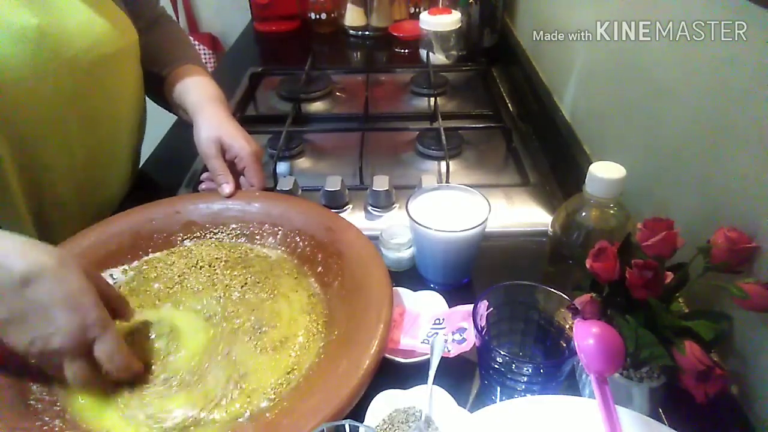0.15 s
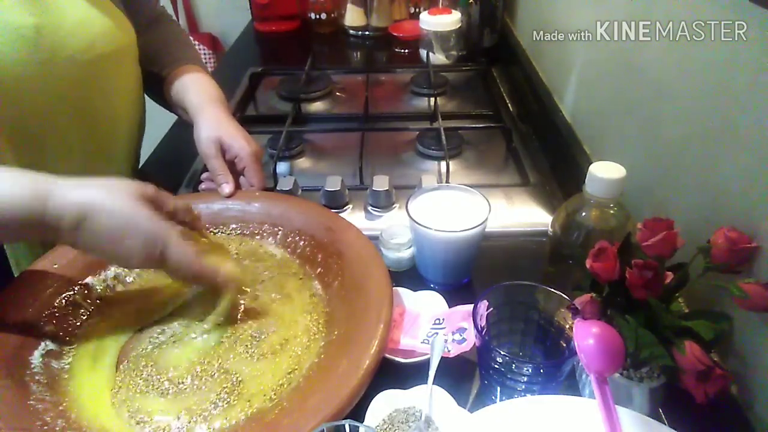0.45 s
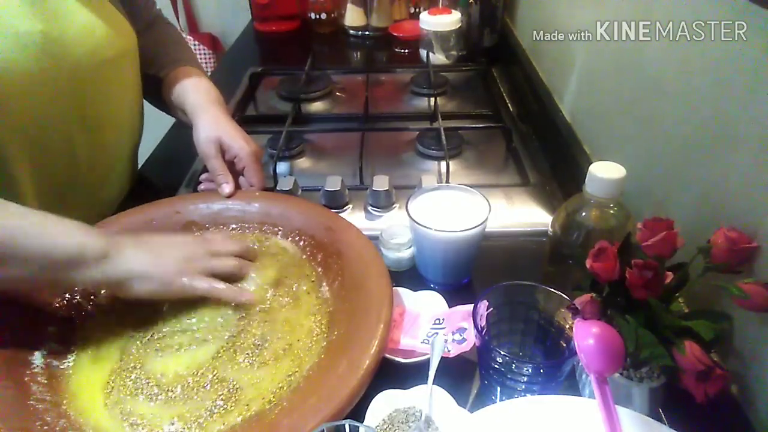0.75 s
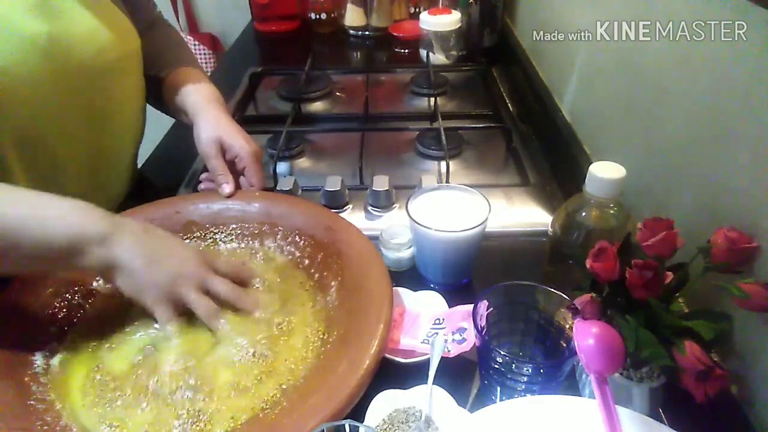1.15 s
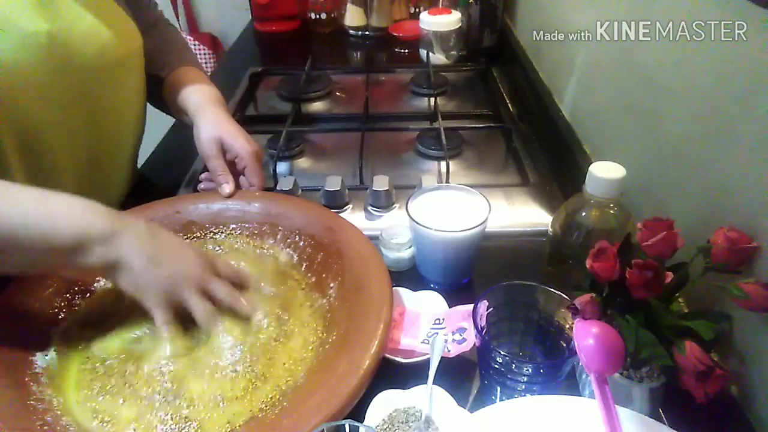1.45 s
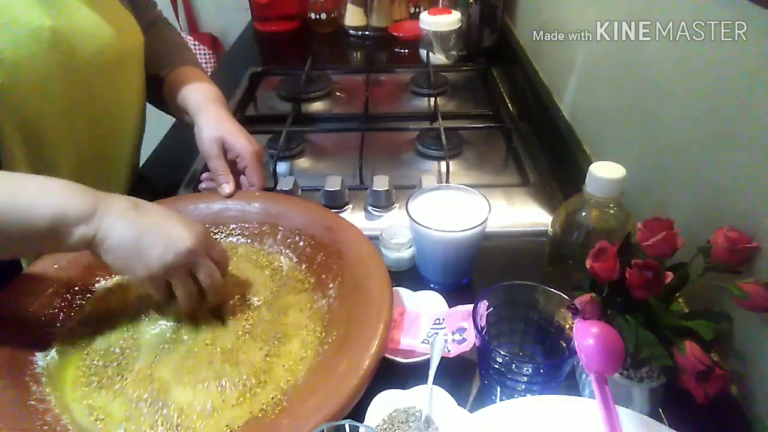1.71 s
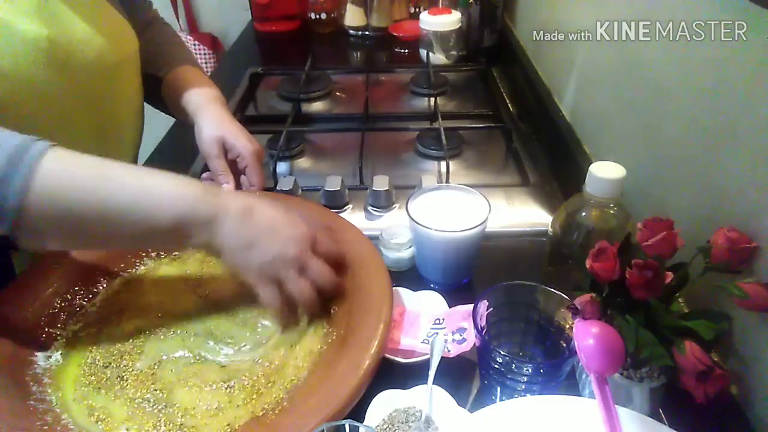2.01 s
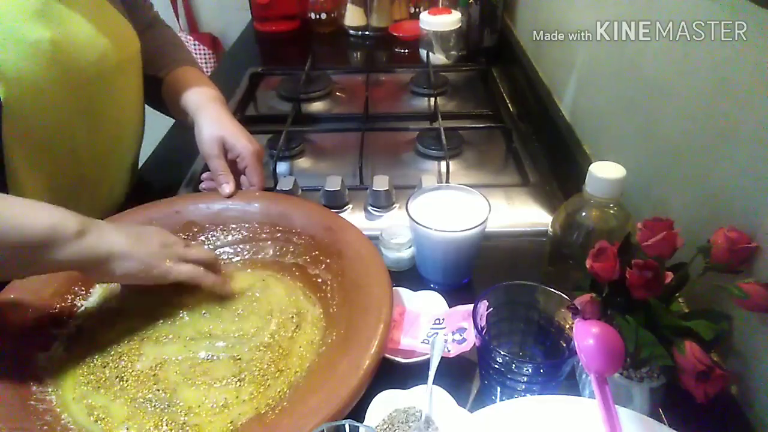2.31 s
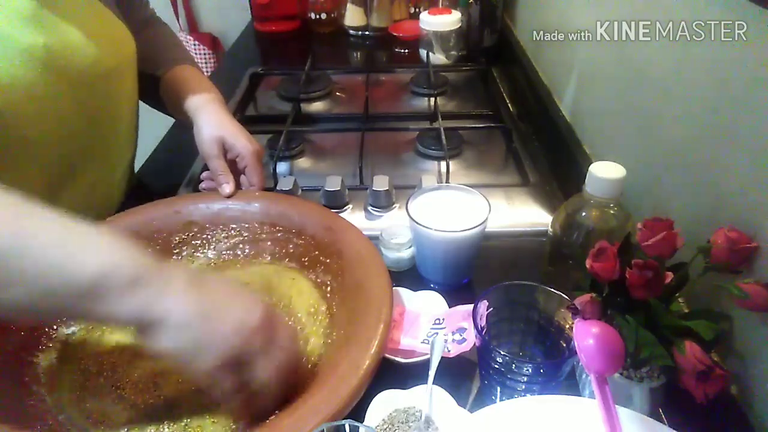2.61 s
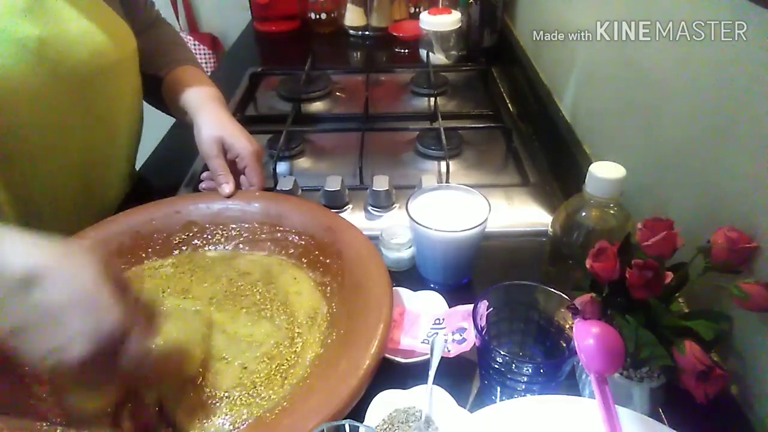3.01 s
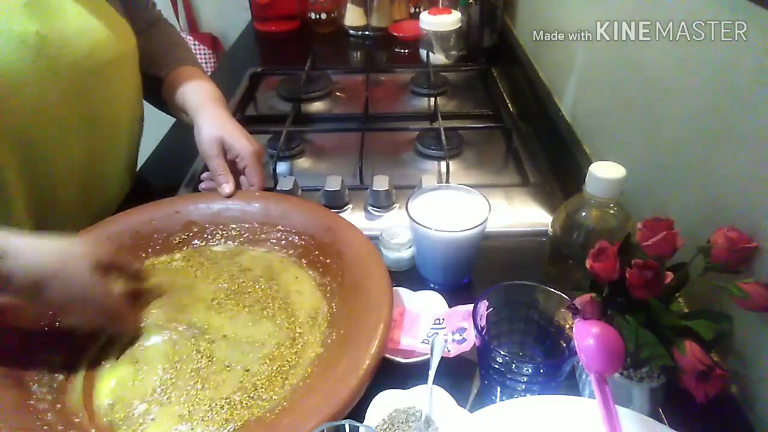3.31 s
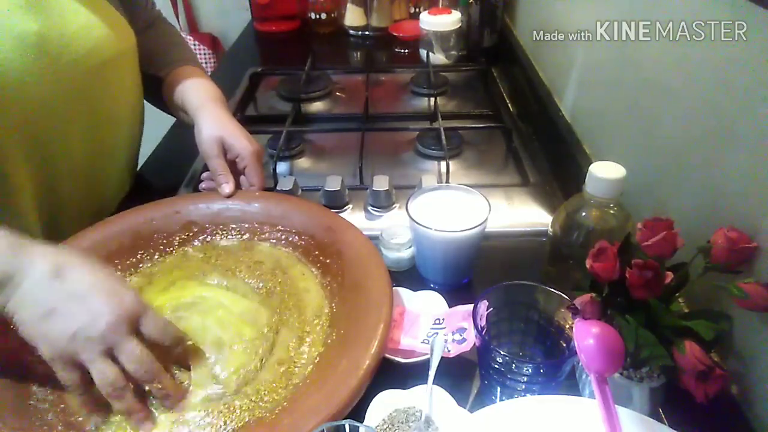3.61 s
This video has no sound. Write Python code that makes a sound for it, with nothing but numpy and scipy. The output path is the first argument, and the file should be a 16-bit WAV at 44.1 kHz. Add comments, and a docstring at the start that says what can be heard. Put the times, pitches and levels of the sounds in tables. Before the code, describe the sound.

A hand stirs wet, seedy batter in a clay bowl, close up in a small reverberant kitchen. A stroke dies away, then a loud wet slap and snaps land at 0.19 s. Gritty squishes last until 0.5, softer swishes run 0.75-1.0 and 1.1-1.8 with hollow plops. Low bowl thumps open stronger, hissier scrapes at 2.07 and 2.7; after a brief pause, another comes at 3.2-3.5, then near silence over faint hum.

```python
"""A hand stirs oily batter full of seeds round a wide glazed clay bowl in a small kitchen.
First a stroke dies away, then the hand lands: wet films snap, the clay rings and the liquid slaps.
It scoops, lifts, pushes and swirls, as clicks (seeds, rubbing) and bubbles (sloshing) swell and fade.
Knocks and low thumps of the bowl open a sweep and a drag; after a short pause the hand returns.
Hollow plops and gurgles dot the way; noise-like room tails and a faint mains hum lie around it all."""
import sys
import numpy as np
from scipy import signal
from scipy.io import wavfile
from scipy.ndimage import uniform_filter1d

SR = 44100
rng = np.random.default_rng(int(sys.argv[2]) if len(sys.argv) > 2 else 0)


def dump(signal):
    """Clip the signal to [-1, 1] and save it as 16-bit WAV at the path in sys.argv[1]."""
    limited = np.clip(np.atleast_2d(signal).T, -1, 1)
    pcm = np.round(limited * 32767).astype(np.int16)
    wavfile.write(sys.argv[1], SR, pcm)


N = 165375
T = np.arange(N) / SR
HIT_ROOM_DB = -5  # room tail against the direct sound


def amp(db):
    """Decibels to gain."""
    return 10 ** (np.asarray(db) / 20)


def unit(x):
    """Scales to an rms of one."""
    return x / np.sqrt(np.mean(x ** 2) + 1e-20)


def read(points, hz):
    """Reads a table on a log-frequency axis."""
    f, value = np.transpose(points)
    return np.interp(np.log(hz + 1), np.log(f + 1), value)


def add(mix, s, sound):
    """Mixes a sound in at a time in seconds."""
    part = mix[max(round(s * SR), 0):][:len(sound)]
    part += sound[:len(part)]


def colour(x, points, size=2048):
    """Causal filter of unit energy with the given spectrum."""
    hz = abs(np.fft.fftfreq(size, 1 / SR))
    log_gain = np.log(amp(read(points, hz)))
    # minimum phase puts the energy at the start of the kernel
    spectrum = np.exp(np.conj(signal.hilbert(log_gain)))
    kernel = np.fft.ifft(spectrum).real
    return signal.fftconvolve(x, kernel / np.linalg.norm(kernel))[:len(x)]


def clicks(per_s, spread_db, size=N):
    """Random clicks of uneven size and either polarity, at unit rms."""
    strength = amp(spread_db * np.minimum(rng.exponential(1, size), 4))
    polarity = rng.choice([-1., 1.], size)
    struck = rng.random(size) < per_s / SR
    return unit(strength * polarity * struck)


def bubbles(per_s, spread_db, cycles, glide, low_hz=300, high_hz=2600, count=28):
    """Tiny bubbles of many sizes, each a short rising note that falls to 1/e in the given cycles."""
    t = np.arange(2048) / SR
    out = np.zeros(N)
    for hz in np.geomspace(low_hz, high_hz, count):
        age = hz * t / cycles
        note = np.sin(2 * np.pi * hz * t * (1 + glide * age)) * np.exp(-age)
        starts = clicks(per_s / count, spread_db)
        out += signal.oaconvolve(starts, unit(note) * np.sqrt(hz))[:N]
    return unit(out)


def patchy(x, patch_db, width=4, length=10):
    """Uneven colour: smooth random gains over time and frequency."""
    z = signal.stft(x, nperseg=512)[2]
    field = rng.standard_normal(z.shape[::-1])
    field = uniform_filter1d(field, int(length), 0)  # over time frames
    field = uniform_filter1d(field, int(width), 1)  # over frequency bins
    gain = amp(patch_db * unit(field)).T
    return unit(signal.istft(z * gain, nperseg=512)[1][:N])


def kitchen(pair, pan_db, room_db, shared=0.0):
    """Hard walls answer: direct sound at two microphones plus tails, alike by the share given."""
    # decay of the room: (frequency [Hz], t60 [s])
    room_t60 = [(100, 0.81), (300, 0.36), (1000, 0.21), (3000, 0.23), (7000, 0.12), (15000, 0.31)]
    t = np.arange(SR * 3 // 4) / SR
    taps = rng.choice([-1., 1.], (2, len(t))) * (rng.random((2, len(t))) < .1)  # sparse reflections
    taps[1] = shared * taps[0] + np.sqrt(max(1 - shared ** 2, 0)) * taps[1]
    onset = np.minimum(t / 0.0027, 1)
    hz, when, z = signal.stft(taps * onset, SR, nperseg=256)
    decay = amp(-60 * when / read(room_t60, hz)[:, None])
    tail = signal.istft(z * decay, SR, nperseg=256)[1][:, :len(t)]
    lean = np.array([[1], [-1]]) * pan_db / 2  # positive pan favours the first channel
    echo = amp(room_db + 0.89 * lean) * tail / np.linalg.norm(tail, axis=1)[:, None]
    echo[:, :1] += amp(lean)  # direct sound
    echo /= np.sqrt(np.sum(echo ** 2) / 2)
    return signal.fftconvolve(np.atleast_2d(pair), echo, axes=1)[:, :N]


def stirring():
    """Seeds tick over the glaze, the palm rubs the paste, liquid froths; each side scatters anew."""
    # phases of stirring, levels before each layer's trim:
    # (time [s], seed hiss [dB], rubbing [dB], sloshing [dB])
    lead_in = [(0.0, -53, -53, -53.5), (0.072, -60.5, -71, -87.5), (0.13, -69.5, -82.5, -107)]
    scoop = [(0.214, -46, -45, -57), (.285, -54.5, -57, -48)]
    lift = [(0.345, -51, -52.5, -48), (0.451, -57.5, -59, -61), (0.491, -53.5, -64.5, -65),
            (0.529, -54.5, -71.5, -81), (0.619, -76, -110, -100), (0.719, -77.5, -85, -100)]
    push = [(0.748, -61, -53.5, -66.5), (0.776, -51.5, -59, -63.5), (0.896, -50, -53.5, -48.5),
            (0.99, -59.5, -62.5, -65.5), (1.04, -70.5, -79, -110), (1.07, -68, -81, -92)]
    swirl = [(1.099, -59.5, -74, -100), (1.13, -55, -64.5, -84), (1.162, -51, -54, -53.5),
             (1.4, -54, -58, -56.5), (1.56, -50.5, -54.5, -47.5), (1.72, -60, -60, -54.5),
             (1.82, -67.5, -90, -79.5), (1.93, -71, -100, -105), (1.98, -67, -92.5, -103),
             (2.038, -69, -81.5, -92), (2.05, -70, -99, -93)]
    sweep = [(2.075, -52.5, -59.5, -95), (2.111, -50, -55, -70), (2.147, -43.5, -48.5, -53.5),
             (2.185, -48, -51, -60), (2.294, -41, -45.5, -47), (2.407, -52, -54.5, -56.5),
             (2.506, -61.5, -72.5, -81.5), (2.575, -72, -94, -107), (2.68, -74.5, -101, -101)]
    drag = [(2.704, -54.5, -57, -77), (2.735, -47.5, -69, -76.5), (2.766, -39.5, -54, -86),
            (2.8, -42.5, -48, -65), (2.885, -44.5, -48, -60), (2.925, -42.5, -53, -50),
            (2.965, -51, -53.5, -70), (3.04, -64.5, -75, -111), (3.085, -62.5, -83, -96),
            (3.125, -80.5, -96, -100)]
    pause = [(3.158, -52, -81, -65), (3.198, -67.5, -72.5, -99)]
    back = [(3.221, -48.5, -53, -76), (3.27, -46, -51, -65), (3.32, -44, -43.5, -60),
            (3.362, -39.5, -44, -54), (3.42, -53, -53.5, -51), (3.5, -66, -68.5, -80),
            (3.59, -79, -100, -104), (3.68, -65, -88, -100), (3.74, -68.5, -77.5, -86)]
    # colours of seeds, rubbing, sloshing and fine spray: (frequency [Hz], level [dB per Hz])
    hiss_colour = [(1500, -43), (3800, -8), (5200, -1), (6800, 4), (8200, -1.5), (10000, -14.5),
                   (13000, -35.5), (15500, -45)]
    rub_colour = [(700, -22), (1400, -11.5), (2000, 4), (2900, 8), (4300, 4.5), (5500, 0), (8000, -33.5),
                  (15000, -21)]
    slosh_colour = [(60, -38), (250, -13), (430, -22), (560, -13), (750, -8.5), (1000, 1), (1500, -9.5),
                    (2200, -12), (5000, -57.5)]
    fizz_colour = [(6000, -18), (9000, 13), (11000, 8), (13500, 3), (15500, -42.5)]
    hiss_db, rub_db, slosh_db = -2.11, -3.5, -7  # trims of the layers
    splash_db = -8.5  # sparse wet pops among the seeds, following the rubbing
    lump_db, lump_hz = 1.02, 54.6  # rms depth and upper edge of the flutter
    fizz_db, fizz_from_db, fizz_growth = -49, -40, 1.36  # level where the hiss is at -40 dB; dB per dB
    room_db = -4.5

    phases = [lead_in, scoop, lift, push, swirl, sweep, drag, pause, back]
    s, *levels = np.vstack(phases).T
    # the fingers catch and slip on clumps of seeds
    smooth = signal.butter(2, lump_hz, fs=SR, output="sos")
    lumps = lump_db * unit(signal.sosfilt(smooth, rng.standard_normal(N)))
    # the stirring starts lowered, swells briefly, then dips just before the landing
    swell_and_dip = amp(np.interp(T, [.13, .155, .178, .195], [-4.0, 5, -10, 0]))
    strokes = [np.sqrt(2) * amp(np.interp(T, s, level) + lumps) for level in levels]
    hiss, rub, slosh = [stroke * swell_and_dip for stroke in strokes]

    seeds, paste, froth, splashes, spray = np.zeros((5, 2, N))
    for side in range(2):
        ticks = colour(clicks(per_s=9000, spread_db=1.0), hiss_colour)
        seeds[side] = patchy(ticks, patch_db=0.65, width=5.5)
        grains = colour(clicks(per_s=3500, spread_db=1.5), rub_colour)
        paste[side] = patchy(grains, patch_db=2.5, width=4.8)
        foam = bubbles(per_s=550, spread_db=3.5, cycles=10, glide=0.041)
        froth[side] = patchy(colour(foam, slosh_colour), patch_db=1.0, width=6.7)
        splashes[side] = bubbles(per_s=260, spread_db=2.0, cycles=13, glide=0.017,
                                 low_hz=1204, high_hz=5486)
        spray[side] = colour(clicks(per_s=5600, spread_db=3.5), fizz_colour)

    # the spray of tiny bursts grows faster than the hiss in hard strokes
    fizz = amp(fizz_db) * (hiss / amp(fizz_from_db)) ** fizz_growth
    rubbing = (paste * amp(rub_db) + splashes * amp(splash_db)) * rub
    return (kitchen(seeds * hiss * amp(hiss_db), pan_db=5, room_db=room_db)
            + kitchen(spray * fizz, pan_db=-1.5, room_db=room_db)
            + kitchen(rubbing, pan_db=0.5, room_db=room_db)
            + kitchen(froth * slosh * amp(slosh_db), pan_db=0.2, room_db=room_db))


def smacks():
    """A wet film tears in a quick cluster of snaps: fading random clicks round one pitch."""
    # wet smacks and seed snaps:
    # (time [s], level [dB], length [s], pitch [Hz], brightness width [octaves])
    snaps = [(0.156, -58, 0.005, 1740, 0.75), (0.179, -43, 0.021, 5770, 1),
             (0.185, -30, 0.0041, 5670, 0.66), (.188, -26.5, 0.0058, 5840, 0.42),
             (0.292, -45.5, 0.032, 5900, 0.98), (.306, -36, 0.024, 4600, 0.84),
             (0.313, -38, 0.0068, 5130, 0.83), (0.317, -25.5, 0.0036, 4040, 0.5),
             (0.486, -49, 0.0079, 6000, 0.47), (.677, -59, 0.0061, 7580, 0.49),
             (0.736, -47.5, 0.023, 6700, 0.62), (0.888, -37.5, 0.0049, 6140, 0.19),
             (1.27, -39, 0.0012, 4970, 0.4), (1.33, -49, 0.033, 5070, 0.51),
             (1.92, -51.5, 0.0012, 7060, 0.27), (2.014, -51.5, 0.0034, 7000, 0.53),
             (2.031, -46.5, 0.0039, 5300, 0.29), (2.065, -43.5, 0.017, 5320, 0.46),
             (2.383, -44, 0.016, 5240, 0.51), (2.664, -62, 0.015, 6970, 0.65),
             (2.694, -46, 0.02, 7100, 0.79), (2.831, -36, 0.0062, 6740, 0.2),
             (2.903, -36.5, 0.0091, 6730, 0.54), (2.915, -25, 0.0026, 5840, 0.52),
             (2.93, -32.5, 0.0026, 5250, 0.43), (3.139, -52.5, 0.0061, 5930, 0.98),
             (3.146, -38.5, 0.0019, 6000, 1), (3.2095, -34.5, 0.01, 7200, 0.38),
             (3.608, -68, 0.01, 6850, 0.37), (3.694, -59, 0.011, 4920, 1),
             (3.722, -56.5, 0.0067, 6500, 0.2)]
    out = np.zeros((2, N))
    t = np.arange(4096) / SR
    hz = np.geomspace(100, 16000, 40)
    for s, db, length, centre_hz, octaves in snaps:
        distance = np.log2(hz / centre_hz) / octaves
        shape = -10 * np.log10(1 + distance ** 2) * 2.76
        for side in out:
            burst = clicks(per_s=12000, spread_db=8.5, size=len(t)) * np.exp(-(t / length) ** 2)
            burst *= np.sqrt(length * SR) / np.linalg.norm(burst)
            add(side, s, amp(db) * colour(burst, np.column_stack([hz, shape])))
    return kitchen(out, pan_db=4, room_db=HIT_ROOM_DB)


def knocks():
    """The damped clay rings in decaying modes under the hand, and the liquid slaps as a noise burst."""
    # the hand lands on the bowl: (time [s], clay ring [dB], slap of liquid [dB])
    landings = [(0.186, -50, -22.5), (0.743, -82, -68), (2.067, -65.5, -79), (2.692, -56, -79)]
    # ring of the clay: (frequency [Hz], relative level [dB], t60 [s])
    bowl = [(820, 5, 0.1), (1314, 1, 0.14), (2105, 6, .075), (2880, 4, .06), (3600, 2, 0.08)]
    # colour of the slap: (frequency [Hz], level [dB per Hz])
    slap_colour = [(40, -37.5), (130, -10.5), (280, -5), (430, -19), (650, -8.5), (1000, 8.5), (1300, -8),
                   (1600, 1.5), (2200, -16.5), (5000, -54)]
    slap_s = 0.0023  # decay to 1/e
    rings, slaps = np.zeros((2, 2, N))
    t = np.arange(SR // 2) / SR
    for s, ring_db, slap_db in landings:
        for side in range(2):
            ring = np.zeros(len(t))
            for hz, db, t60 in bowl:
                turns = hz * t + side * .25  # the sides are a quarter cycle apart
                ring += amp(ring_db + db - 60 * t / t60) * np.sin(2 * np.pi * turns)
            add(rings[side], s, ring / 2)
            burst = rng.standard_normal(len(t)) * np.exp(-t / slap_s)
            add(slaps[side], s, amp(slap_db) * colour(burst, slap_colour))
    return rings + kitchen(slaps, pan_db=-3.0, room_db=-2.5)


def thumps():
    """The heavy bowl rocks on the counter in low pulses, each a sagging tone and a dull thud."""
    # the bowl rocks: (time [s], level [dB], middle pitch [Hz], tone t60 [s])
    rocks = [(0.191, -53, 255, 0.13), (0.197, -49.5, 172.3, .26), (0.742, -58.5, 162, 0.14),
             (.755, -52, 102.6, 0.3), (0.792, -53, 102, 0.063), (2.072, -47.5, 171, 0.17),
             (2.082, -42.5, 109, 0.23), (2.081, -60, 240, 0.039), (2.145, -49, 161, 0.16),
             (2.188, -50, 101.2, 0.3), (2.693, -52, 155, 0.094), (2.735, -56, 150, .07)]
    rise_s, sag = 0.0053, 0.072  # the pitch slides from 7.2 % above the middle to 7.2 % below
    thud_db, thud_hz, thud_t60_s = -17.5, 380, 0.073  # toneless part: start level, upper edge, decay
    low = np.zeros(N)
    t = np.arange(SR // 2) / SR
    dull = signal.butter(2, [90, thud_hz], "band", fs=SR, output="sos")
    opening = 1 - np.exp(-(t / rise_s) ** 2)
    for s, db, hz, t60 in rocks:
        pitch = hz * (1 + sag * (2 * np.exp(-t / 0.025) - 1))
        tone = amp(-60 * t / t60) * np.sin(2 * np.pi * np.cumsum(pitch) / SR)
        noise = unit(signal.sosfilt(dull, rng.standard_normal(len(t))))
        thud = amp(thud_db - 60 * t / thud_t60_s) * noise
        add(low, s, amp(db) * 2 * opening * (tone + thud))
    low = signal.sosfilt(signal.butter(2, 55, "high", fs=SR, output="sos"), low)
    return kitchen(low, pan_db=-3.5, room_db=-14, shared=0.78)


def plops():
    """Each hollow opens within a few cycles and rings away, rising slightly in pitch."""
    # hollow ring of the bowl as the hand lands (first rows), then pockets that pop open and ring:
    # (time [s], start pitch [Hz], level [dB], t60 [s])
    hollow_rings = [(.187, 885, -44, 0.13), (.187, 1597, -45.5, 0.065), (.19, 539, -54, 0.12),
                    (0.215, 1020, -55, 0.071), (0.525, 540, -50.5, 0.11), (1.218, 683, -55.5, 0.14),
                    (1.332, 524, -58.5, 0.1), (1.482, 1776, -57, 0.34), (1.521, 343.3, -58.5, 0.41),
                    (1.534, 546, -47, 0.054), (1.538, 710, -46, .07), (1.576, 623, -43, 0.084),
                    (1.715, 1007, -48.5, 0.073), (2.866, 360, -61.5, 0.14), (2.92, 719, -52, 0.064),
                    (3.204, 526, -61.5, 0.079), (3.226, 554, -57, 0.086), (3.342, 975, -52.5, .12),
                    (3.378, 989, -50, 0.096), (3.448, 469, -68, 0.28)]
    rise_cycles = 4.5
    phase_glide = 0.091  # per second; the pitch itself rises twice as fast
    out = np.zeros(N)
    t = np.arange(SR // 2) / SR
    for s, hz, db, t60 in hollow_rings:
        opening = 1 - np.exp(-(hz * t / rise_cycles) ** 2)
        note = np.sin(2 * np.pi * hz * t * (1 + phase_glide * t))
        add(out, s, 2 * amp(db - 60 * t / t60) * opening * note)
    return kitchen(out, pan_db=3.0, room_db=-3.5)


def gurgles():
    """Air churns in a hollow under the moving hand: narrow noise that slides in pitch."""
    # churning hollows:
    # (time [s], length [s], start pitch [Hz], end pitch [Hz], bandwidth [Hz], level [dB])
    hollows = [(0.192, 0.054, 1076, 998, 277, -49), (0.306, 0.13, 929, 785, 136, -57),
               (0.445, 0.09, 561, 557, 55.56, -66), (0.869, 0.06, 561, 512, 110, -65.5),
               (1.137, 0.089, 1258, 993, 231.5, -56.5), (1.528, .12, 602, 706.4, 300, -62.5),
               (1.943, 0.19, 791, 776, 74.07, -83), (2.766, 0.052, 763, 684, 120, -62),
               (3.306, 0.042, 882, 890, 150, -59)]
    out = np.zeros(N)
    for s, length, start_hz, end_hz, width_hz, db in hollows:
        u = np.arange(0, 1, 1 / (length * SR))  # progress through the gurgle
        smooth = signal.butter(2, max(width_hz, 2) / 2, fs=SR, output="sos")
        noise = rng.standard_normal(SR) + 1j * rng.standard_normal(SR)
        drive = signal.sosfilt(smooth, noise)[-len(u):]
        turns = np.cumsum(start_hz + (end_hz - start_hz) * u) / SR
        note = (drive * np.exp(2j * np.pi * turns)).real
        add(out, s, amp(db) * unit(note * np.sin(np.pi * u)))
    return kitchen(out, pan_db=2.8, room_db=2.5)


def background():
    """Mains hum as steady sines, a low rumble and the still air of the room as coloured noise."""
    # mains hum: (frequency [Hz], rms level [dB])
    hum_tones = [(100.5, -83.5), (150, -87)]
    # colours of air and rumble: (frequency [Hz], level [dB per Hz])
    air_colour = [(25, -13.5), (120, 4), (250, 6.5), (500, 12.5), (1000, -2.5), (3000, -4.5), (7000, 13),
                  (15000, -20)]
    rumble_colour = [(20, -14.5), (55, -1), (100, 8), (170, -6), (300, -5.5), (600, -19), (2000, -35.5)]
    air_db, rumble_db = -81, -85
    hum = np.zeros(N)
    for hz, db in hum_tones:
        hum += amp(db) * np.sqrt(2) * np.sin(2 * np.pi * (hz * T + rng.random()))
    air = colour(rng.standard_normal(N), air_colour) * amp(air_db)
    rumble = colour(rng.standard_normal(N), rumble_colour) * amp(rumble_db)
    lean = amp([[-1.2], [1.2]])  # hum and rumble favour the second channel
    return (hum + rumble) * lean + kitchen(air, pan_db=0.5, room_db=4.5)


def scene():
    """Everything heard at the counter."""
    return stirring() + smacks() + knocks() + thumps() + plops() + gurgles() + background()


def record(dry):
    """The recorder's band limit: a steep low-pass at 14.5 kHz."""
    low_pass = signal.firwin(401, 14500, window=("kaiser", 8), fs=SR)
    return signal.oaconvolve(dry, low_pass[None], "same")


dry = scene()
out = record(dry)
dump(out)
```